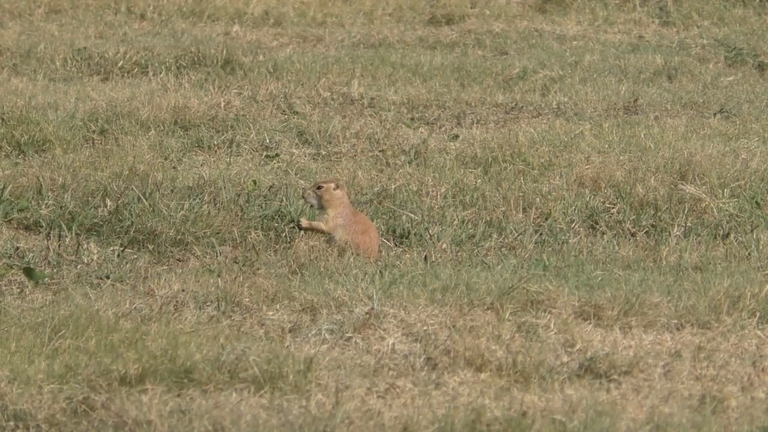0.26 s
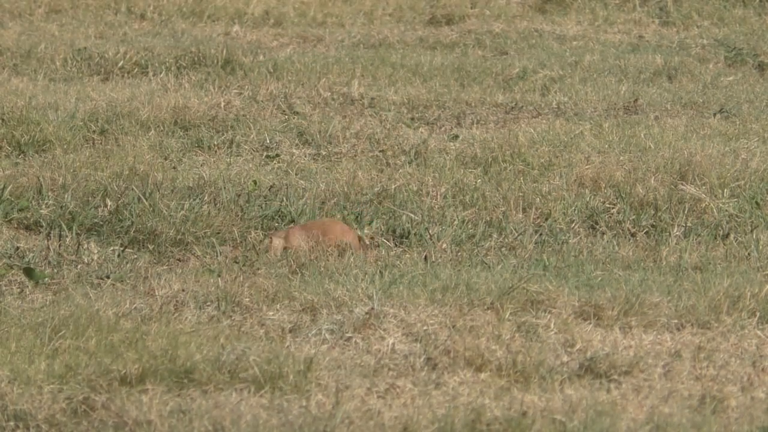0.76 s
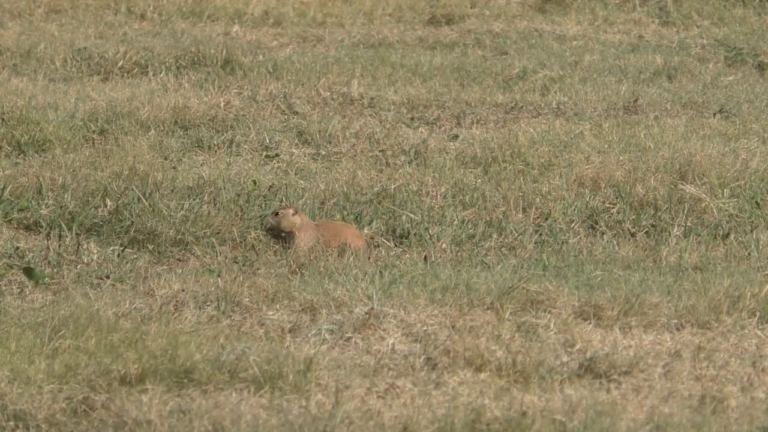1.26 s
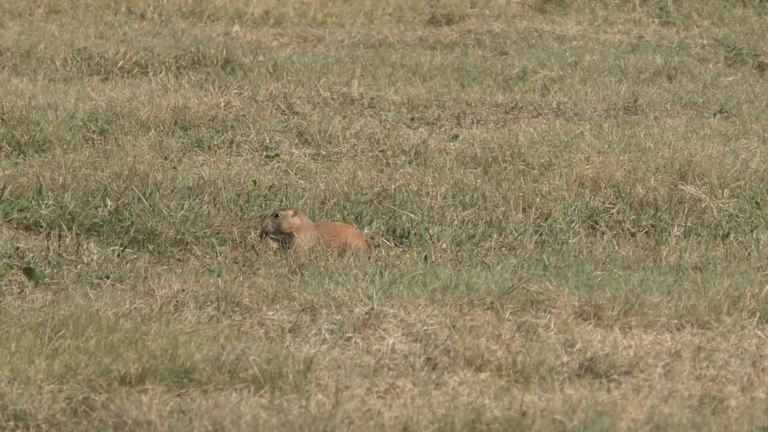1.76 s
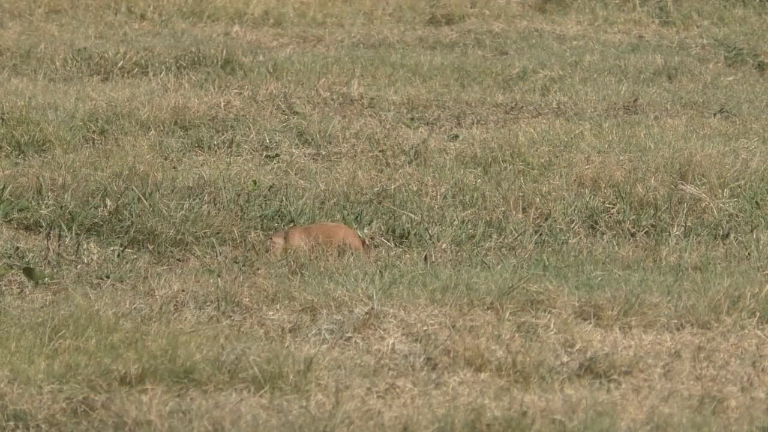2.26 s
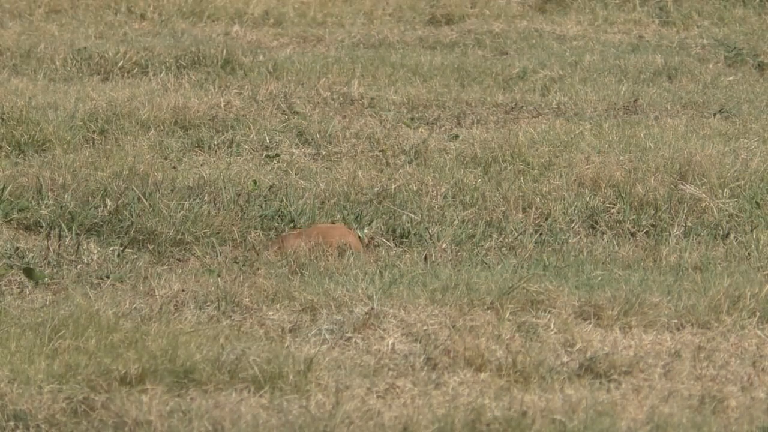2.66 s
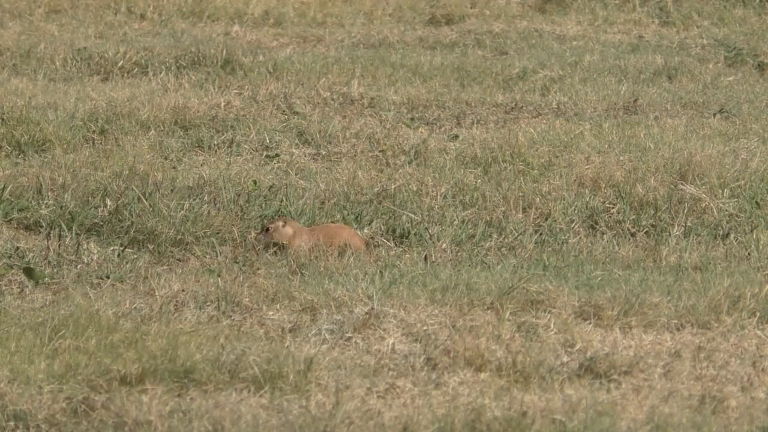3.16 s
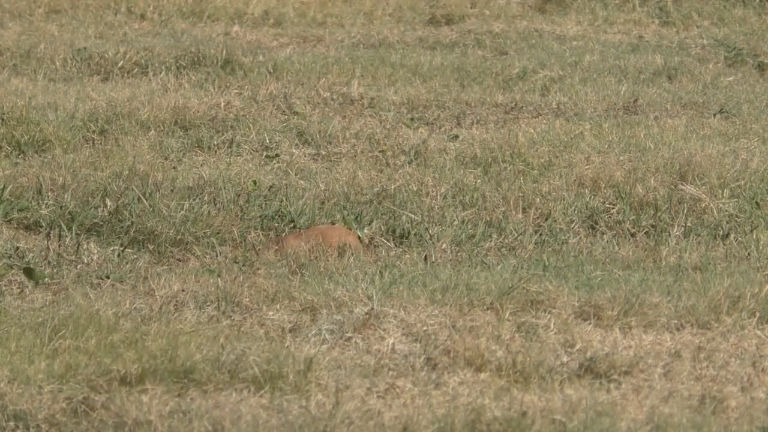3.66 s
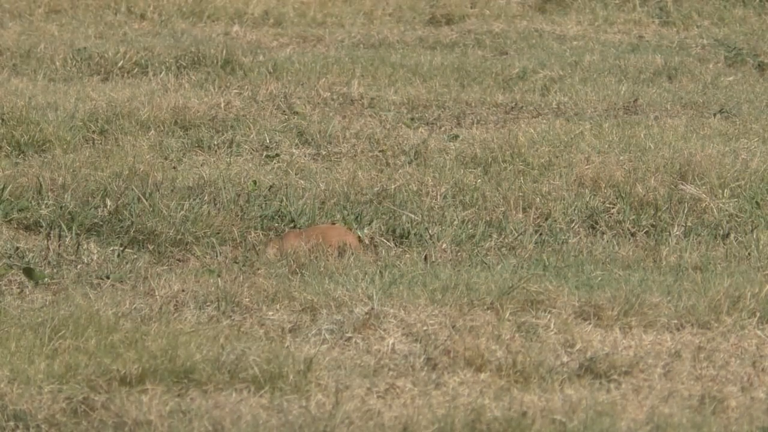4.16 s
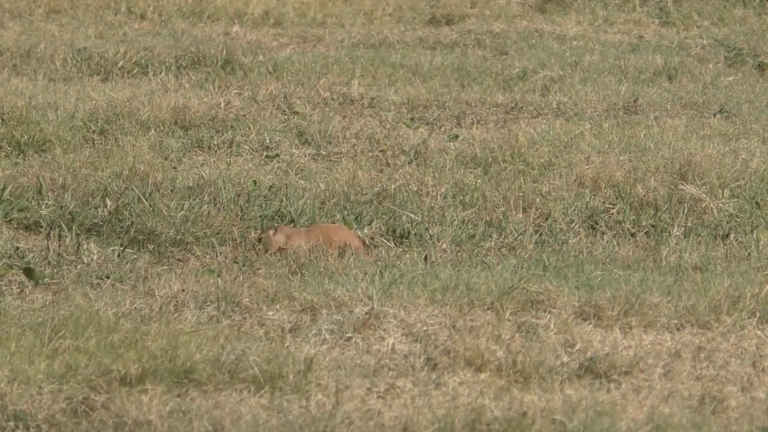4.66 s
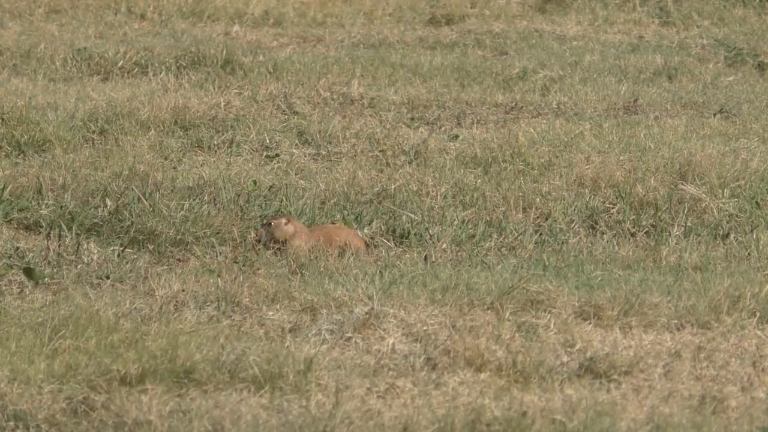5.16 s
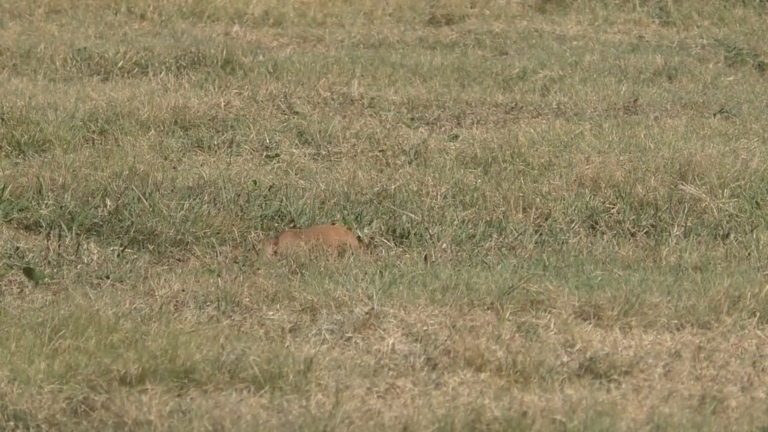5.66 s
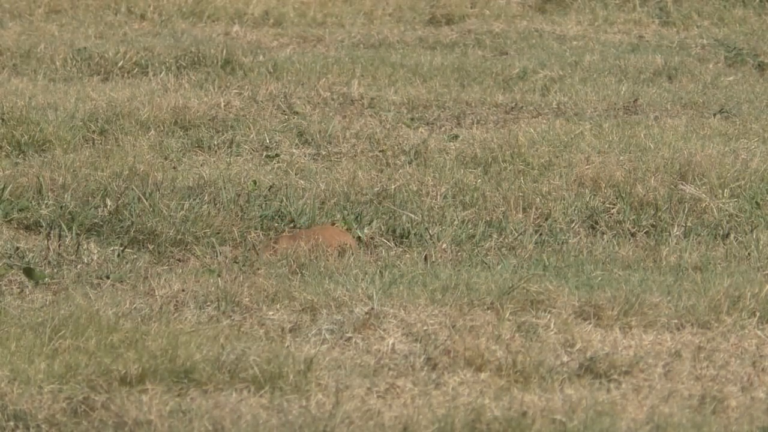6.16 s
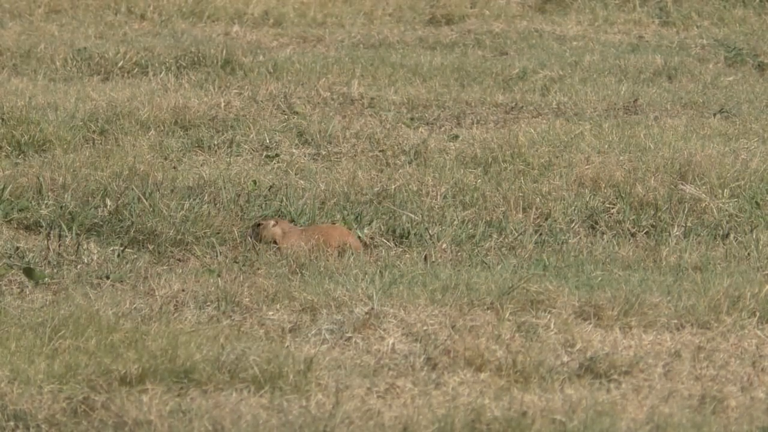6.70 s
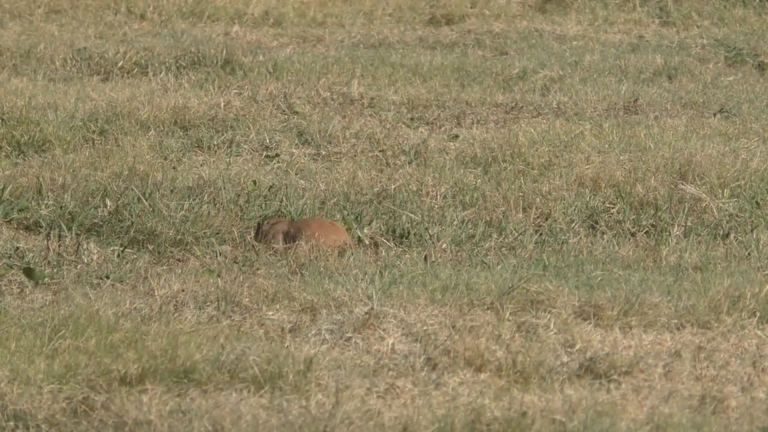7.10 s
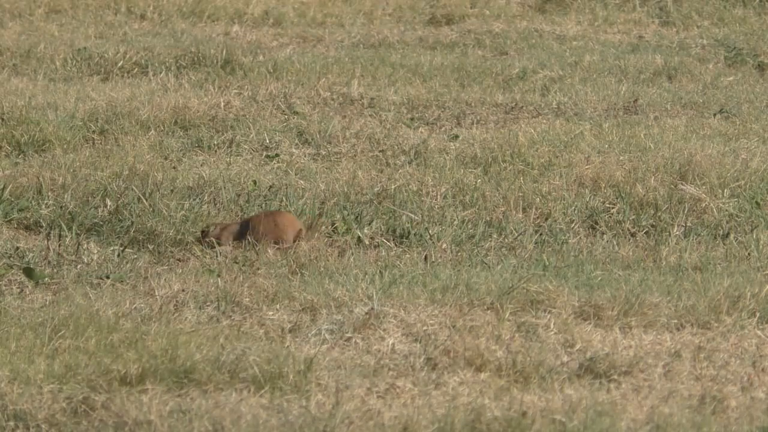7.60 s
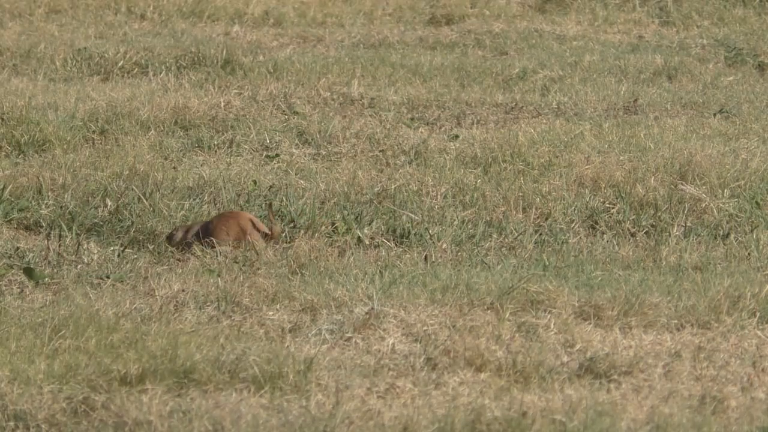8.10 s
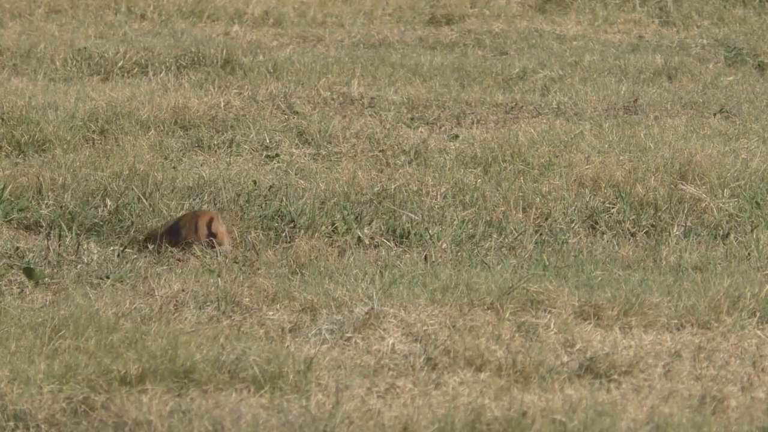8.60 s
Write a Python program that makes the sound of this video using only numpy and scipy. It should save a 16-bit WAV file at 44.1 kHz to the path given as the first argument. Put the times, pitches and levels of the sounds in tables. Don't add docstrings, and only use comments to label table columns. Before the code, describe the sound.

A prairie dog gives sharp, yelping barks across open grassland for several seconds, then falls silent among crickets, rasping grasshoppers and light wind.

```python
import sys
import numpy as np
from scipy import signal
from scipy.fft import rfft, irfft
from scipy.io import wavfile
from scipy.ndimage import uniform_filter1d

SR = 44100
rng = np.random.default_rng(int(sys.argv[2]) if len(sys.argv) > 2 else 0)


def nominal_scale(level):
    x = np.asarray(level, float) / 20
    return 10 ** x


def generate_wav(sig):
    pcm = np.round(np.clip(np.atleast_2d(sig).T, -1, 1) * 32767).astype(np.int16)
    wavfile.write(sys.argv[1], SR, pcm)


N = 389844

# (start [s], held [s], peak [dB], arch pitch [Hz], roughness [0-1])
BARKS = [
    (-0.2, .2, -16, 1100, 0.47),
    (0.527, 0.24, -17.5, 1114, 0.23),
    (1.219, 0.23, -16, 1085, 0.4),
    (1.921, 0.23, -15.5, 1084, 0.34),
    (2.643, 0.23, -17.5, 1082, 0.26),
    (3.358, 0.23, -18.5, 1069, 0.26),
    (4.396, 0.25, -23, 1137, 0.48),
]
USUAL_DB = -17.5


def rms_one(x):
    return x / np.sqrt(np.mean(x ** 2) + 1e-20)


def in_time(rows):
    s, *columns = np.transpose(rows)
    return [np.interp(np.arange(N) / SR, s, c) for c in columns]


def gated(tables, fade):
    out = np.zeros(N)
    for rows in tables:
        s, db = np.transpose(rows)[[0, -1]]
        i = np.arange(max(int((s[0] - fade) * SR), 0), min(int((s[-1] + fade) * SR), N))
        inside = np.minimum(i / SR - s[0], s[-1] - i / SR)
        out[i] += nominal_scale(np.interp(i / SR, s, db)) * np.clip(inside / fade + 1, 0, 1)
    return out


def at_hz(points, hz):
    point_hz, db = np.transpose(points)
    return np.interp(np.log(hz + 1), np.log(point_hz), db)


def drift(rate):
    r = np.exp(-2 * np.pi * rate / SR)
    return rms_one(signal.lfilter([1], [1, -2 * r, r * r], rng.standard_normal(N + SR))[SR:])


def colour(x, spectrum):
    cepstrum = irfft(np.log(nominal_scale(at_hz(spectrum, np.linspace(0, SR / 2, 2049)))))
    cepstrum[1:2048] *= 2
    cepstrum[2049:] = 0
    return signal.fftconvolve(x, irfft(np.exp(rfft(cepstrum))))[:N]


def butter(x, order, hz, kind):
    return signal.sosfilt(signal.butter(order, hz, kind, fs=SR, output="sos"), x)


def resonate(x, hz, width_hz):
    r = np.exp(-np.pi * width_hz / SR)
    poles = [1, -2 * r * np.cos(2 * np.pi * hz / SR), r * r]
    return signal.lfilter([(1 - r * r) / 2, 0, (r * r - 1) / 2], poles, x + 1e-18)


def pan(x, db):
    return np.array([x * nominal_scale(db / 2), x * nominal_scale(-db / 2)])


def clicks(per_s, uneven, size_db):
    turns = np.floor(np.cumsum(per_s * np.exp(uneven * drift(per_s / 4))) / SR)
    return np.diff(turns, prepend=0) * nominal_scale(size_db * rng.standard_normal(N))


def effort():
    onset_db, attack_s = -10, .013
    release_s, release_db = 0.045, -24
    spent_db, sag_per_s = -24.5, 2.19
    tables = []
    for s, held, db, *_ in BARKS:
        end_db = db - sag_per_s * held * (db - spent_db)
        bright = 0.35 + 0.17 * (db - USUAL_DB)
        dull = bright - 15.5 * held
        tables.append([(s - .003, bright, db + onset_db), (s + attack_s, bright, db),
                       (s + held, dull, end_db), (s + held + release_s, dull, end_db + release_db)])
    return tables


def pitch_and_push():
    # (start [s], time up [s], top pitch [Hz], push [dB])
    flips = [(-0.008, 0.023, 1474, 0), (0.029, 0.016, 1539, 7), (0.587, .031, 1538, -.5),
             (0.633, 0.022, 1438, 2), (0.666, 0.023, 1496, 2), (0.707, .019, 1466, 0.5),
             (0.743, 0.028, 1554, -1), (1.283, 0.016, 1414, -0.5), (1.321, 0.019, 1399, -1.5),
             (1.356, 0.02, 1504, 2.5), (1.392, 0.017, 1521, 1.5), (1.431, 0.03, 1519, 1.5),
             (1.475, 0.018, 1482, 0), (1.983, 0.017, 1461, -1), (2.019, .014, 1422, 1.5),
             (2.057, 0.019, 1460, 0), (2.101, 0.017, 1510, -1.5), (2.136, .023, 1536, -2.5),
             (2.167, .011, 1496, 0), (2.703, 0.026, 1483, -1.5), (2.744, .018, 1467, -1),
             (2.777, 0.025, 1498, 0), (2.816, 0.023, 1540, 0.5), (2.855, 0.024, 1550, 0.5),
             (3.421, 0.021, 1432, -2.5), (3.454, 0.023, 1504, -1), (3.491, 0.023, 1499, 0),
             (3.527, .021, 1442, 0), (3.565, 0.021, 1470, 0), (3.604, 0.011, 1485, 7)]
    # (pitch where the sagging top breaks [Hz], low register [Hz])
    registers = [(1374, 1080), (1300, 1070), (1310, 1062), (1305, 1045), (1305, 1058), (1243, 1062)]
    # (time of lowest pitch [s], lowest pitch [Hz], push [dB])
    slips = [
        (4.487, 1238, 1),
        (4.521, 1293, -1),
        (4.552, 1412, 0),
        (4.582, 1327, -2),
        (4.62, 1263, 1.5),
        (4.67, 1388, -2),
    ]
    stay_s, stay_hz, slip_s, regain_s = 4.459, 1524, .017, .009
    top_at, bend_at, bend_share = 0.256, .62, .36

    points = []   # (time [s], pitch [Hz], push [dB], strain [0-1])
    for s, _, _, arch_hz, _ in BARKS:
        dip_hz = .89 * arch_hz
        points += [(s, .68 * arch_hz, 0, .25), (s + .006, .85 * arch_hz, 0, .25),
                   (s + .012, .945 * arch_hz, 0, .25), (s + 0.02582, arch_hz, 0, .25),
                   (s + 0.04, .965 * arch_hz, 0, .3), (s + .048, dip_hz, 0, .6),
                   (s + .057, 1.08 * dip_hz, 0, 1)]
    points += [(stay_s, stay_hz, 0, 1)]
    for s, hz, push in slips:
        points += [(s - slip_s, stay_hz, 0, 1), (s - .004, 1.02 * hz, push, 1),
                   (s, hz, push, 1), (s + regain_s, stay_hz, 0, 1)]
    for (s, up, top_hz, push), later in zip(flips, flips[1:] + flips[:1]):
        shoulder_hz, low_hz = registers[sum(bark[0] < s for bark in BARKS) - 1]
        bend_hz = top_hz - bend_share * (top_hz - shoulder_hz)
        points += [(s + .002, .95 * top_hz, push, 1), (s + top_at * up, top_hz, push, 1),
                   (s + bend_at * up, bend_hz, push, 1), (s + up - .0008, shoulder_hz, push, 1),
                   (s + up + .0008, 1.04 * low_hz, 0, 1)]
        if .008 < later[0] - s - up < .06:
            points += [((s + up + later[0]) / 2, low_hz, 0, 1), (later[0] - .002, 1.04 * low_hz, 0, 1)]

    curves = in_time(sorted(points))
    falling = uniform_filter1d(np.clip(-np.gradient(curves[0]) * 2.5, 0, 1), size=110)
    pitch, push, strain = [uniform_filter1d(c, size=70) for c in curves]
    jump = uniform_filter1d(np.abs(np.gradient(pitch)), size=90)
    snap_db = 4.5 * (1 - strain) + strain * (11.0 * falling - 9.0)
    return pitch, push - 4.0 * jump, strain, snap_db


def prairie_dog():
    # (frequency [Hz], level [dB])
    throat = [(450, -46), (750, -27.5), (1050, -10.5), (1500, -10.5), (1800, -4.5), (2120, 3.5),
              (2500, 5.5), (3050, 1), (3600, -4.5), (4200, -6), (4800, -21), (5600, -11), (6800, -9),
              (7700, -26), (8500, -20), (11000, -25), (15000, -34)]
    t = np.arange(N) / SR
    pitch, push, strain, snap_db = pitch_and_push()
    peak_db, rough = in_time([(s + later, db, r) for s, _, db, _, r in BARKS for later in (0, .4)])
    stronger_db = peak_db - USUAL_DB
    bright_db = in_time(np.vstack(effort()))[0]
    rough = rough * strain

    turns = np.cumsum(pitch * (1 + .06 * rough * drift(300))) / SR
    overtones = sum(np.cos(2 * np.pi * k * turns) / (1 + (k / 7.3) ** 2) for k in range(3, 11))
    overtones = overtones * nominal_scale(snap_db + 0.45 * np.minimum(stronger_db, 0) + bright_db)
    fundamental = nominal_scale(-0.97 - 0.65 * stronger_db) * np.cos(2 * np.pi * turns)
    pulses = overtones + 0.98 * np.cos(4 * np.pi * turns) + fundamental
    shimmer = nominal_scale(rough * (5.0 * drift(120) + 3.0 * drift(500)))
    breath = signal.lfilter([1, -.7], [1], rng.standard_normal(N)) * (1 + np.cos(2 * np.pi * turns))
    source = (pulses * shimmer + (0.27 + 0.93 * rough) * breath) * np.sqrt(pitch / 1200)

    opened = sum(np.clip((t - s) / .005, 0, 1) * (t < s + .4) for s, *_ in BARKS)
    voice = colour(source * nominal_scale(push) * opened * gated(effort(), fade=0.0011), throat)
    top = butter(voice, 4, 4800, "high")
    low = butter(voice, 4, 4800, "low")
    haze = .85 * strain + (.95 - .5 * strain) * np.tanh(drift(300))
    haze = haze * nominal_scale(1.5 * drift(60) - 13.0 * (1 - strain))
    return nominal_scale(-6.0) * (low + top * haze * nominal_scale(bright_db + 9.0))


def field_echo(x):
    t = np.arange(SR) / SR
    quick, slow = rng.standard_normal((2, 2, SR))
    quick = (quick + 1.1 * quick[0]) * nominal_scale([[1.5], [-3.0]])
    quick = quick * nominal_scale(-42 - 60 * t / .14) * (t > .008)
    slow = butter(slow, 2, [1700, 3500], "band") * nominal_scale([[1.5], [-1.5]])
    slow = slow * nominal_scale(-50.0 - 60 * t / 1.12) * (t > .03)
    blurred = x * drift(110)
    near = signal.fftconvolve((2.0 * x + 2.25 * blurred)[None], quick, axes=1)
    far = signal.fftconvolve(blurred[None], slow, axes=1)
    return (near + far)[:, :N]


def chest():
    rush = butter(rng.standard_normal((2, N)), 2, [170, 620], "band")
    return nominal_scale(-31.5) * rms_one(rush) * gated(effort(), fade=0.0067)


def crickets():
    # (time [s], level [dB])
    chorus = [(0, -71), (2, -68.5), (4.5, -68), (6.5, -70), (7.6, -64.5), (8.84, -66.5)]
    # (middle [s], length [s], depth [dB])
    pauses = [(0.148, .08, 12), (1.17, 0.068, 4), (2.402, 0.057, 9), (3.285, 0.092, 10), (4.026, 0.056, 26),
              (5.019, 0.061, 16), (5.98, 0.075, 16), (6.42, 0.049, 8), (6.9, 0.15, 10), (7.81, 0.069, 12),
              (8.132, 0.13, 8)]
    t, out = np.arange(N) / SR, 0
    for per_s, hz, side_db in [(89, 5700, -5.5), (81.7, 5380, -12.0)]:
        strokes = np.cumsum(per_s * (1 + 0.0322 * drift(2.2))) / SR
        beat = np.maximum(np.sin(2 * np.pi * strokes), 0)
        scrape = rng.standard_normal(N) * (beat + 0.59)
        trill = resonate(resonate(scrape, hz, 370), hz, 370)
        out = out + pan(rms_one(trill), side_db)
    pause_db = sum(depth * np.clip(1.5 - 3 * np.abs(t - s) / length, 0, 1) for s, length, depth in pauses)
    return out * nominal_scale(in_time(chorus)[0] - pause_db + 1.5 * drift(3))


def wind():
    # (time of peak [s], peak [dB], rise over 15 dB [s], fall over 15 dB [s])
    puffs = [(1.33, -42, 0.14, .05), (1.77, -38.5, 0.13, .3), (2.04, -28, 0.16, 0.29),
             (2.58, -39.5, 0.058, .2), (2.73, -32.5, .1, 0.049), (2.85, -35.5, 0.094, .04),
             (3.098, -41, 0.31, 0.21), (3.4, -36.5, 0.13, 0.1), (3.618, -33, .11, 0.079),
             (4.11, -36.5, .3, 0.12), (4.28, -44, .2, 0.14), (4.361, -32.5, 0.14, .03),
             (4.55, -34.5, 0.39, 0.25), (5.56, -44, 0.14, .05), (5.71, -40.5, 0.17, 0.11),
             (5.81, -33.5, 0.024, .035), (5.89, -45, .03, 0.14), (7.19, -43, 0.2, 0.26),
             (7.41, -40.5, 0.056, .18), (7.7, -39.5, .25, 0.033), (8.08, -44.5, 1, 0.064),
             (8.39, -45, 0.55, 0.19), (8.67, -35.5, 0.05, .08)]
    # (frequency [Hz], density [dB per Hz])
    gust = [(12, -32), (20, -14), (87, -0.5), (167, -6.5), (231, -8.5), (370, -19.5), (506, -19.5),
            (600, -34), (1320, -120)]
    calm_db = -51.5
    t = np.arange(N) / SR
    puff_db = [db - 15 * np.where(t < s, (s - t) / rise, (t - s) / fall) for s, db, rise, fall in puffs]
    thud_db = np.max(puff_db, axis=0).clip(calm_db)
    shared, lumps = rng.standard_normal(N), drift(26)
    ports = np.array([colour(rng.standard_normal(N) + .7 * shared, gust) * nominal_scale(1.5 * lumps + 1.2 * drift(6))
                      for _ in range(2)])
    thud, flutter = [rms_one(butter(ports, 3, 110, kind)) for kind in ("low", "high")]
    return thud * nominal_scale(thud_db + 2.0) + flutter * nominal_scale(-51 + 0.57 * (thud_db - calm_db))


def air():
    # (frequency [Hz], density [dB per Hz])
    hiss = [(88, -52.5), (150, 3.5), (352, 1), (509, -8), (595, -14), (766, -15.5), (1000, -6),
            (1700, -4.5), (4650, -17), (5540, -20), (6230, -24.5), (11600, -16.5), (15500, -17)]
    # (time [s], level [dB])
    swell = [(0.0, -49.5), (0.57, -54.5), (0.76, -49), (1.9, -52), (2.02, -50), (5.86, -52.5),
             (6.33, -53.5), (8.84, -51.5)]
    # (frequency [Hz], left-right likeness [-1 to 1])
    likeness = [(100, -0.47), (290, -0.036), (640, 0.52), (1410, 0.11), (3100, 0.13), (6820, 0.49),
                (11000, 0.4)]
    hz = np.geomspace(60, 20000, 40)
    alike = np.clip(at_hz(likeness, hz), -.9, .9)
    mid, side = [colour(rng.standard_normal(N), np.c_[hz, at_hz(hiss, hz) + 10 * np.log10(1 + sign * alike)])
                 for sign in (1, -1)]
    return nominal_scale(in_time(swell)[0] + 17.5 + .5 * drift(5.9)) * np.array([mid + side, mid - side])


def birds():
    # (start [s], length [s], pitch [Hz], first level [dB], last level [dB])
    whistles = [
        (0.253, 0.0091, 2820, -46, -52),
        (4.0, 0.22, 2620, -56, -57),
        (3.99, 0.073, 4110, -61, -59),
        (6.31, 0.16, 2710, -53, -65),
        (7.155, 0.094, 2730, -56, -59),
        (7.17, .05, 1476, -54, -56),
        (7.46, .14, 2000, -58, -60),
        (7.684, 0.193, 2735, -62, -52.5),
        (8.77, .08, 2640, -57, -55),
        (8.78, 0.05, 880, -50.5, -56),
    ]
    # (start [s], length [s], first pitch [Hz], last pitch [Hz], level [dB])
    upslurs = [
        (0.151, 0.1123, 1654, 2390, -45.5),
        (3.796, .095, 1680, 2290, -53),
    ]
    steady, knee = 0.395, 0.66
    scoop_share, scoop_s = 0.083, 0.0091
    out, flutter, part = 0, nominal_scale(2.0 * drift(65)), np.linspace(0, 1, 31)
    slur = steady * part + (1 - steady) * np.clip((part - knee) / (1 - knee), 0, 1)
    notes = [(s, length, hz, 0, first + (last - first) * part, -9) for s, length, hz, first, last in whistles]
    notes += [(s, length, hz, (last_hz - hz) * slur, np.full(31, db), -20.5)
              for s, length, hz, last_hz, db in upslurs]
    for s, length, hz, rise_hz, db, side_db in notes:
        scoop = 1 - scoop_share * np.exp(-length * part / scoop_s)
        rows = np.c_[s + length * part, hz * scoop + rise_hz, db]
        tone = np.sqrt(2) * np.sin(2 * np.pi * np.cumsum(in_time(rows)[0]) / SR) * flutter
        out = out + pan(tone * gated([rows], fade=0.0044), side_db)
    return out


def grasshoppers():
    # (time of peak [s], level [dB])
    rasps = [(0.556, -23.5), (1.375, -22.5), (2.205, -22.5), (3.068, -22.5), (3.843, -23.5), (4.651, -22.5),
             (5.426, -25), (6.178, -24.5), (7.017, -26), (8.099, -23.5)]
    # (frequency [Hz], width [Hz], level [dB], left-right [dB])
    rasp_wing = [(10100, 170, 17, 17), (11760, 2600, 19, 8), (14800, 2600, 10, -24.5)]
    # (first beat [s], last beat [s], first level [dB], last level [dB])
    buzzes = [(0.188, 0.317, -49, -61), (0.868, 1.015, -55, -54), (1.524, 1.668, -48, -46.5),
              (2.289, 2.34, -65, -44), (3.685, 3.741, -103, -92), (5.278, 5.328, -60, -57),
              (6.4, 6.535, -54, -53), (7.094, 7.237, -52, -48), (7.793, 7.934, -47, -45.5),
              (8.622, 8.761, -50, -47)]
    t = np.arange(N) / SR
    pegs = clicks(380, uneven=1.0, size_db=2.5) + 0.19 * rng.standard_normal(N)
    wing = rms_one(sum(pan(nominal_scale(db) * resonate(resonate(pegs, hz, width), hz, width), side)
                       for hz, width, db, side in rasp_wing))
    stroke = sum(nominal_scale(db - 12.0 - np.where(t < s, 260.0, 300.0) * np.abs(t - s)) for s, db in rasps)

    pegs = clicks(500, uneven=0.14, size_db=2.5) + .06 * rng.standard_normal(N)
    buzz = rms_one(resonate(resonate(pegs, 12100, 2200), 11500, 2600))
    beats = np.zeros(N)
    for first, last, first_db, last_db in buzzes:
        count = round((last - first) / .048) + 1
        at = (np.linspace(first, last, count) * SR).astype(int)
        beats[at] = nominal_scale(np.linspace(first_db, last_db, count) - 8.0)
    swell = np.exp(-(np.linspace(-.04, .04, 3529) / 0.019) ** 4)
    return wing * stroke + pan(buzz * signal.fftconvolve(beats, swell, "same"), -9.5)


def grass():
    # (time [s], peak [dB], resonance [Hz], left-right [dB])
    snaps = [
        (7.779, -26, 1280, -3),
        (7.8, -28.5, 950, 0.0),
        (7.867, -33, 890, 0.0),
    ]
    # (start [s], length [s], peak [dB])
    rustles = [
        (2.4, 0.076, -66),
        (2.5, .14, -50),
        (7.85, 0.063, -43.5),
        (7.9, .17, -44.5),
        (8.77, .1, -46),
    ]
    swell_share, edge_db = 0.53, -9.5
    out = 0
    for s, db, hz, side in snaps:
        hit = np.zeros(N)
        hit[round(s * SR) + np.array([0, 45])] = nominal_scale(db + 28.0) * np.array([1, -.4])
        out = out + pan(resonate(resonate(hit, hz, 1100), .8 * hz, 1500), side)
    grains = rng.standard_normal((2, N)) * nominal_scale(3.5 * drift(149.6)) + 0.97 * rng.standard_normal(N)
    blades = rms_one(butter(grains, 3, [450, 2100], "band"))
    brushes = [[(s, db + edge_db), (s + swell_share * length, db), (s + length, db + edge_db)]
               for s, length, db in rustles]
    return out + blades * gated(brushes, fade=0.009)


def scene():
    voice = prairie_dog()
    animal = pan(voice, 6.8) + field_echo(voice) + chest()
    return animal + crickets() + wind() + air() + birds() + grasshoppers() + grass()


def top_cut(x):
    return signal.sosfilt(signal.butter(12, 15890, fs=SR, output="sos"), x)


def record(dry):
    return top_cut(dry)


dry = scene()
out = record(dry)
generate_wav(out)
```